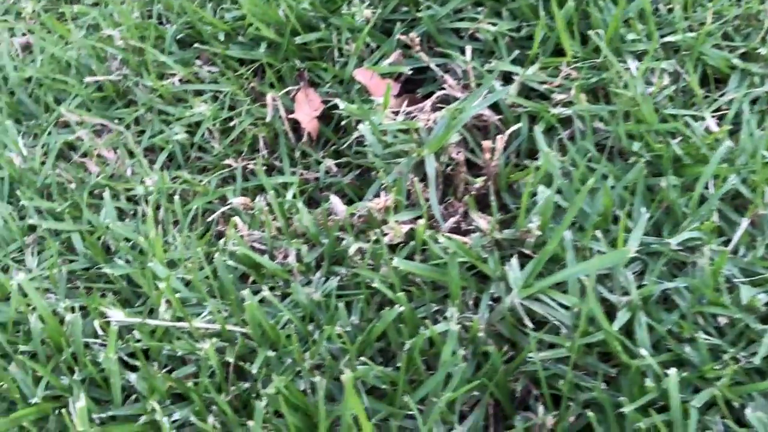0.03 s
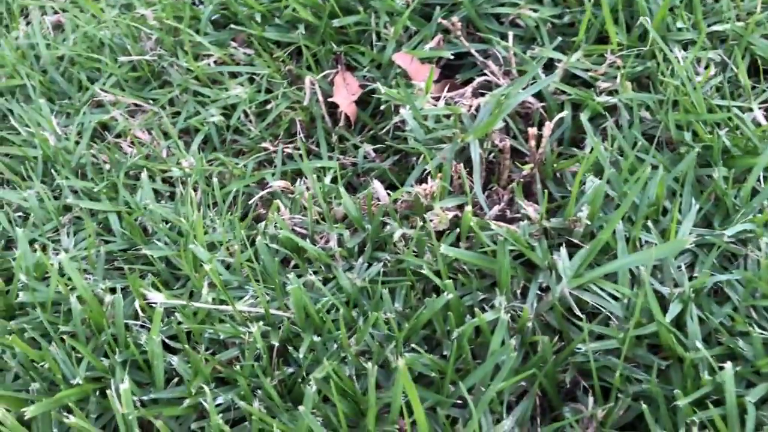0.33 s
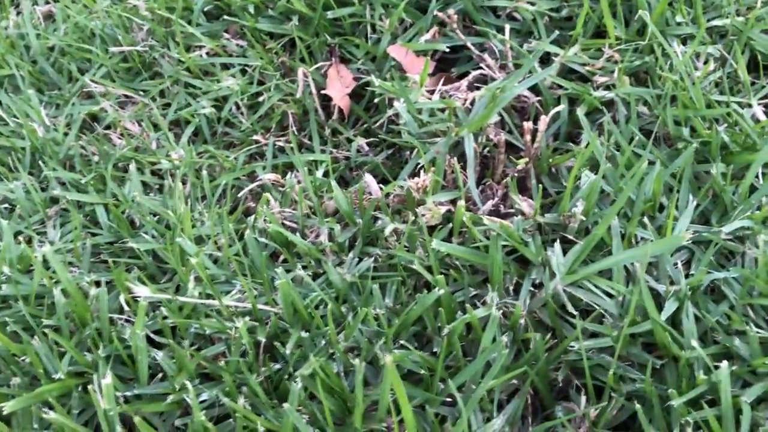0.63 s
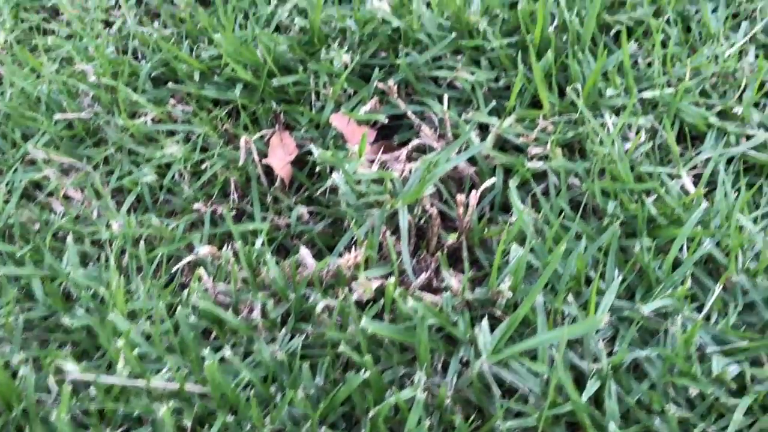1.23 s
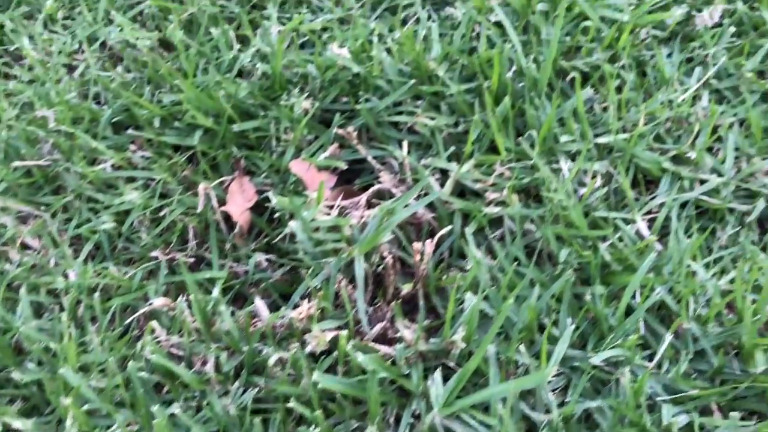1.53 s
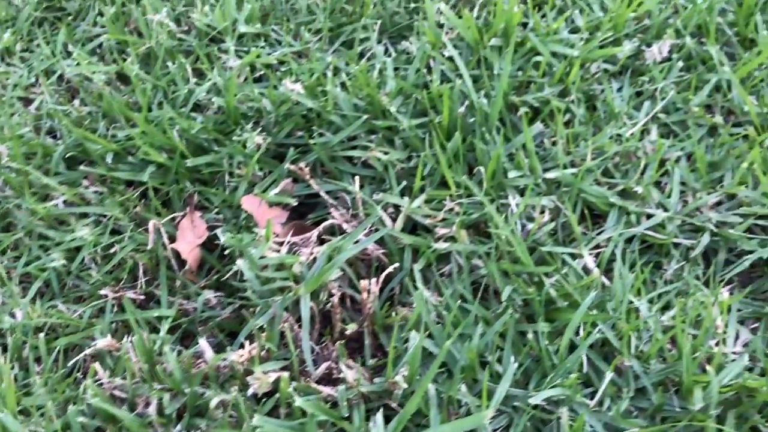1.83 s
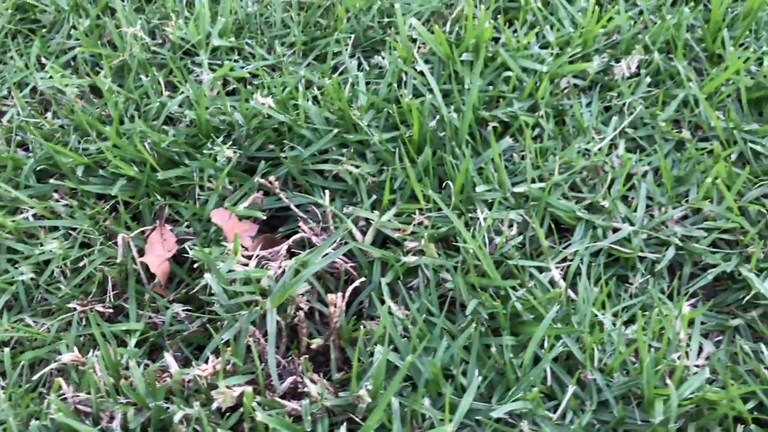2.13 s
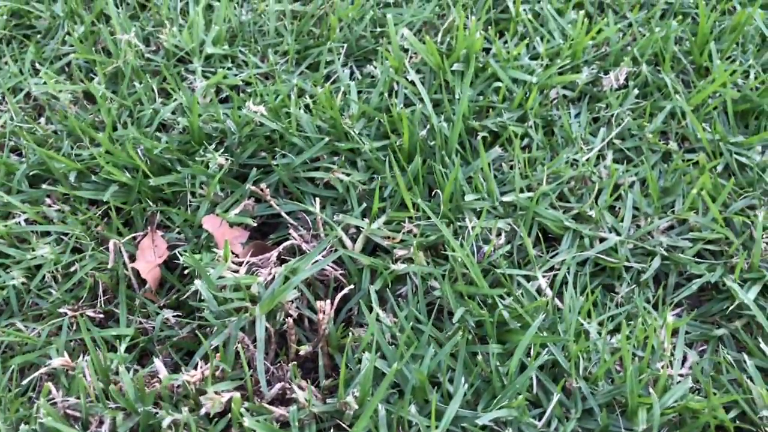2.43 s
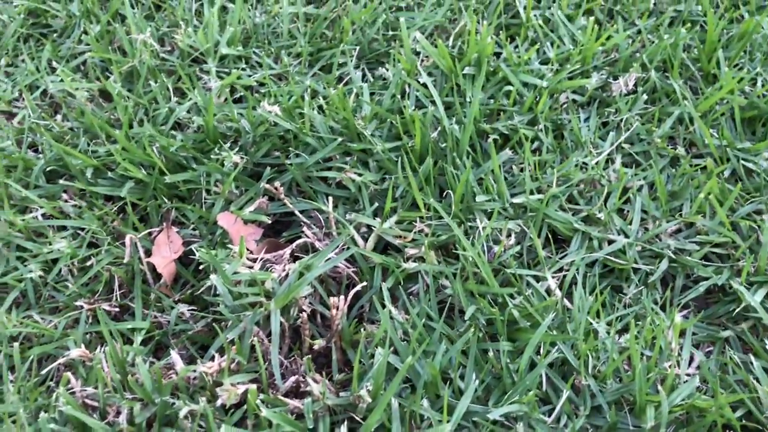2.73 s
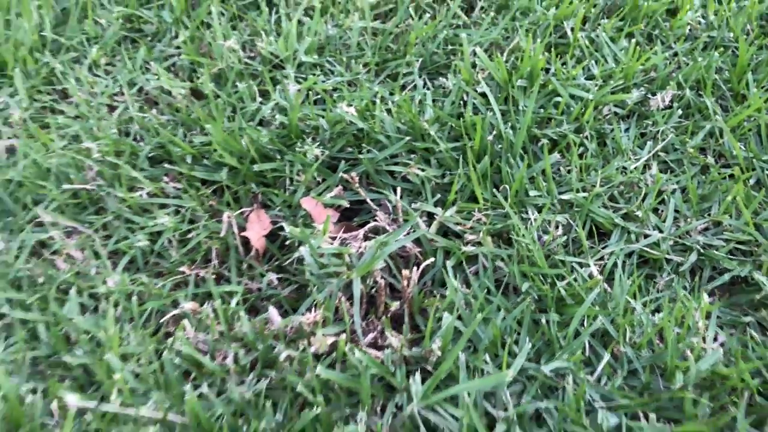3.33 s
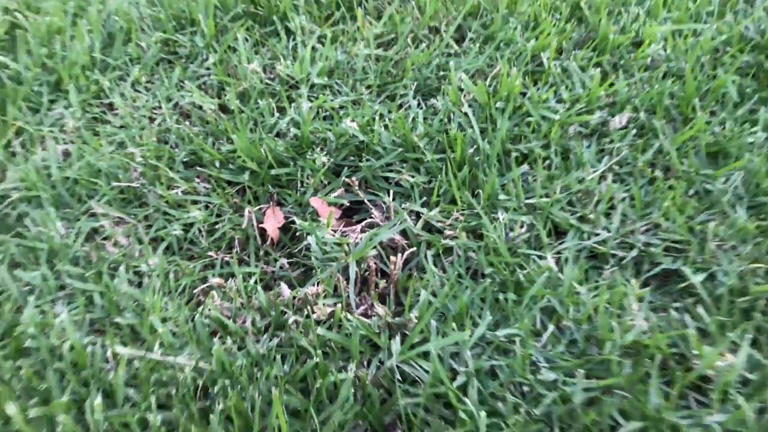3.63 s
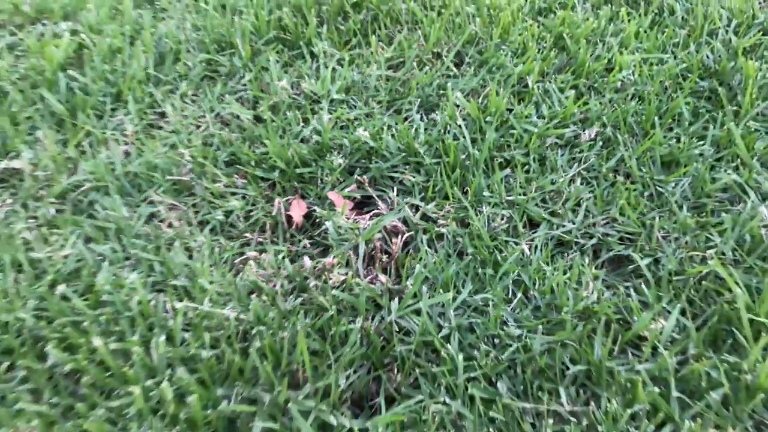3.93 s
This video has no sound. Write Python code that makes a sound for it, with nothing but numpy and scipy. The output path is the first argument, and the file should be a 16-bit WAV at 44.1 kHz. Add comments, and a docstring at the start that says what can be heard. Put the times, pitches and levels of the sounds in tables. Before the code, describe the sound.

A cricket trills loudly from a grassy lawn, close to the microphone. The high, buzzing tone runs without a break and fades a little near the end, over a faint low outdoor rumble.

```python
"""An insect, probably a mole cricket, trills loudly from its burrow in a lawn, close by.
About 62 times a second its wings close and a scraper runs over a file: a short ringing tone
with a snap and a rasp. The wings brush faintly as they reopen. The trill fades a little near
the end. Grass and surroundings scatter it; a low outdoor rumble lies underneath."""
import sys
import numpy as np
from scipy import signal
from scipy.fft import rfft, irfft
from scipy.io import wavfile

SR = 44100
rng = np.random.default_rng(int(sys.argv[2]) if len(sys.argv) > 2 else 0)


def int16_out(signal):
    """Quantize to a 16-bit WAV file."""
    q = np.round(np.clip(np.atleast_2d(signal).T, -1, 1) * 32767)
    wavfile.write(sys.argv[1], SR, q.astype(np.int16))


N = 176400
TIME = np.arange(N) / SR

# Outdoor rumble. Each row: frequency in Hz, relative density in dB.
RUMBLE_SPECTRUM = [(20, -32), (35, -24), (50, -6.5), (68, -2.5), (85, -7), (120, -9), (170, -17.5),
                   (280, -24.5), (400, -32.5), (600, -43), (1200, -39.5), (4000, -32), (16000, -61)]
# Reopening wings. Each row: frequency in Hz, relative density in dB.
BRUSH_SPECTRUM = [(900, -36), (1800, -9.5), (2700, -1), (3500, -7.5), (4600, -8.5), (6500, -17.5),
                  (9500, -22), (14000, -18.5), (16000, -29)]
# Scraper on the file. Each row: frequency in Hz, relative density in dB.
RASP_SPECTRUM = [(700, -50), (1300, -40), (1800, -25), (2700, 1), (3600, 4.5), (4300, -4), (5500, -13.5),
                 (6700, -7), (7900, -16.5), (9000, -20.5), (11500, -20.5), (15500, -26.5)]
# Wing beat. Each row: time in seconds, strokes per second.
BEAT_HZ = [(0.0, 62.02), (0.35, 62.44), (0.82, 62.53), (0.91, 60.85), (1.0, 62.37), (1.55, 62.15),
           (1.8, 62.52), (2.1, 62.3), (2.9, 61.99), (3.35, 61.14), (3.6, 62.2), (3.8, 60.79), (4.0, 61.67)]
# Wing overtones. Each row: multiple, level at stroke start in dB, level at stroke end in dB.
WING_OVERTONES = [(2, -15, -34), (3, -26.5, -19), (4, -48, -29.5), (5, -53, -34), (6, -54, -40)]
# Treble of the trill. Each row: time in seconds, gain in dB.
TREBLE_GAIN_DB = [(0, 2), (.5, -5), (1.1, -0.5), (1.7, 2.5), (2.6, 4), (3.1, 3), (3.6, 1.5), (4, 3.5)]
# Whole trill. Each row: time in seconds, gain in dB.
TRILL_GAIN_DB = [(0, -11), (1.2, -11), (2, -11.5), (3.1, -11.5), (3.5, -12.5), (3.8, -14), (4, -15.5)]

ATTACK_S, HOLD_S, RELEASE_S, SAG_DB = 0.0013, 0.0052, 0.0043, -1.02
JITTER_S, HOLD_SPREAD_S, GAIN_SPREAD_DB = 0.00036, 0.00036, -0.02
TONE_HZ, TONE_SPREAD_HZ = 2422.5, 12
CATCH_HZ, CATCH_S, LIFT_HZ, LIFT_S = 760, 0.00038, 344, 0.0032
WOBBLE_HZ, WOBBLE_DB, WOBBLE_S = 35.8, -0.6629, 0.0013
RASP_DB, SNAP_DB, BRUSH_DB, RUB_DB = -22.5, -21.5, -31, -37  # relative to the tone's peak
SNAP_S, BRUSH_LEAD_S, BRUSH_WIDTH_S, BRUSH_SPREAD_DB = 0.0011, 0.0021, 0.00087, 4.5


def amp(db):
    """Decibels to gain."""
    return 10 ** (np.asarray(db) / 20)


def unit(x):
    """Scale to rms 1."""
    return x / np.sqrt(np.mean(x ** 2) + 1e-20)


def curve(points):
    """Linear interpolation of (seconds, value) points."""
    return np.interp(TIME, *np.transpose(points))


def ease(u):
    """Smooth step from 0 to 1."""
    return np.sin(np.pi / 2 * np.clip(u, 0, 1)) ** 2


def add(mix, start_s, sound):
    """Mix a sound in at start_s."""
    part = mix[max(round(start_s * SR), 0):][:len(sound)]
    part += sound[:len(part)]


def noise(spectrum):
    """Noise of rms 1, shaped by (Hz, dB) points."""
    hz, db = np.transpose(spectrum)
    bins_hz = np.fft.rfftfreq(N, 1 / SR)
    gain = amp(np.interp(np.log(bins_hz + 1), np.log(hz), db))
    return unit(irfft(rfft(rng.standard_normal(N)) * gain, N))


def drift(span_s):
    """Smooth random signal of rms 1, changing over span_s."""
    bins_hz = np.fft.rfftfreq(N, 1 / SR)
    return unit(irfft(rfft(rng.standard_normal(N)) * np.exp(-(bins_hz * span_s) ** 2), N))


def background(rumble_db=-44, swell_db=2.1, hum_hz=69.1, hum_width_hz=3.4, hum_db=-49):
    """Low outdoor rumble with a wavering hum."""
    waver = drift(1 / hum_width_hz) + 1j * drift(1 / hum_width_hz)
    hum = (waver * np.exp(2j * np.pi * hum_hz * TIME)).real
    rumble = noise(RUMBLE_SPECTRUM) * amp(rumble_db + swell_db * drift(span_s=0.18))
    return rumble + amp(hum_db) * unit(hum)


def grass_scatter(source, relative_db=-25, t60_s=0.095):
    """Short, weak reflections from grass and surroundings."""
    t = TIME[:SR // 4]
    tail = rng.standard_normal(len(t)) * amp(-60 * t / t60_s)
    return amp(relative_db) * np.std(source) * unit(signal.fftconvolve(source, tail)[:N])


def stroke_starts_s(offset_turns=0.775):
    """Near-steady wing beat; the scraper catches a little early or late."""
    turns = np.cumsum(curve(BEAT_HZ)) / SR - offset_turns
    starts_s = TIME[1:][np.diff(np.floor(turns)) > 0]
    return starts_s + JITTER_S * rng.standard_normal(len(starts_s))


def wing_ring(t, hold_s, grip, base_hz):
    """One stroke's tone: starts sharp as the scraper catches, rises again as the wings let go."""
    catch_hz = CATCH_HZ * np.exp(-t / CATCH_S)
    lift_hz = LIFT_HZ * ease((t - hold_s + RELEASE_S / 10) / LIFT_S)
    phase = 2 * np.pi * np.cumsum(base_hz + catch_hz + lift_hz) / SR
    progress = np.minimum(t / (hold_s + RELEASE_S / 2), 1)
    overtones = sum(amp(start_db + (end_db - start_db) * progress) * np.sin(round(k) * phase)
                    for k, start_db, end_db in WING_OVERTONES)
    return grip * amp(SAG_DB * progress) * (np.sin(phase) + grip * overtones)


def cricket(treble_hz=9900):
    """Each stroke rings the wings and rasps the file after a soft brush; faint rubbing runs throughout."""
    tone, rasp_env, brush_env = np.zeros((3, N))
    t = np.arange(SR // 64) / SR
    puff = np.exp(-0.5 * ((t - t.mean()) / BRUSH_WIDTH_S) ** 2)
    starts_s = stroke_starts_s()
    wobble_hz, wobble_db = WOBBLE_HZ * drift(WOBBLE_S), WOBBLE_DB * drift(WOBBLE_S)
    for start_s in starts_s:
        long, loud, sharp, brush_loud, brush_late = rng.standard_normal(5)
        span = (round(start_s * SR) + np.arange(len(t))) % N
        hold_s = HOLD_S + HOLD_SPREAD_S * long
        grip = ease(t / ATTACK_S) * (1 - ease((t - hold_s) / RELEASE_S))
        base_hz = TONE_HZ + TONE_SPREAD_HZ * sharp + wobble_hz[span]
        gain = amp(GAIN_SPREAD_DB * loud + wobble_db[span])
        add(tone, start_s, gain * wing_ring(t, hold_s, grip, base_hz))
        add(rasp_env, start_s, amp(RASP_DB) * grip + amp(SNAP_DB) * np.exp(-t / SNAP_S))
        brush_peak_s = start_s - BRUSH_LEAD_S + JITTER_S * brush_late
        add(brush_env, brush_peak_s - t.mean(), amp(BRUSH_DB + BRUSH_SPREAD_DB * brush_loud) * puff)
    rasp = rasp_env * noise(RASP_SPECTRUM)
    brush = (brush_env + amp(RUB_DB)) * noise(BRUSH_SPECTRUM)
    trill = tone + rasp + brush
    treble = signal.sosfiltfilt(signal.butter(2, treble_hz, "high", fs=SR, output="sos"), trill)
    trill += (amp(curve(TREBLE_GAIN_DB)) - 1) * treble
    return trill * amp(curve(TRILL_GAIN_DB))


def scene():
    """Cricket, reflections and background, in mono."""
    trill = cricket()
    return (trill + grass_scatter(trill) + background())[None]


def record(dry):
    """Steep low-pass."""
    cutoff_hz = 15950
    taps = signal.firwin(511, cutoff_hz, window=("kaiser", 9), fs=SR)
    return signal.oaconvolve(dry, taps[None], "same")


dry = scene()
out = record(dry)
int16_out(out)
```